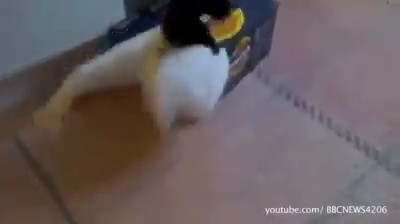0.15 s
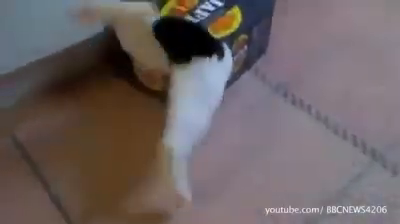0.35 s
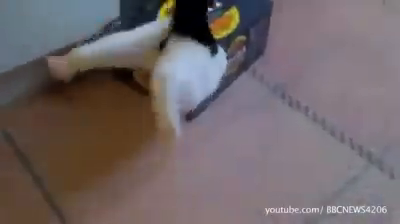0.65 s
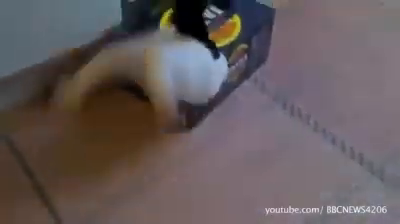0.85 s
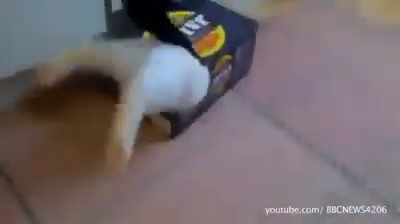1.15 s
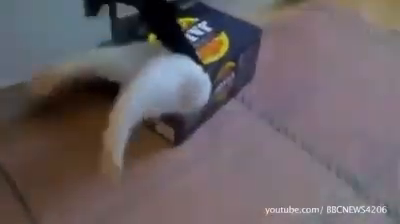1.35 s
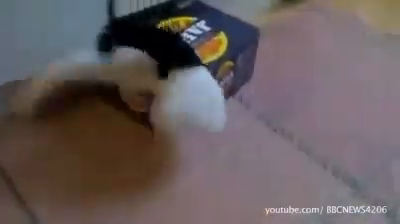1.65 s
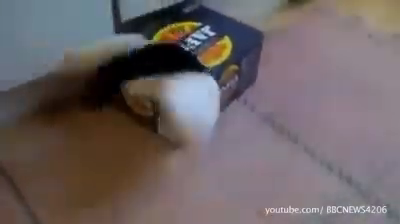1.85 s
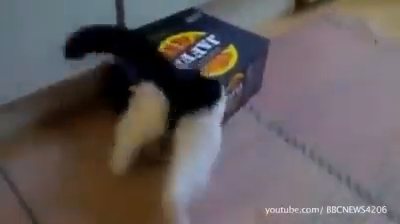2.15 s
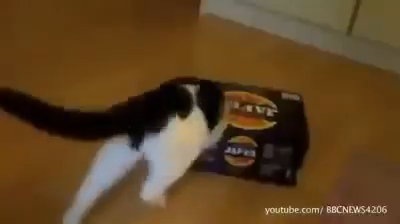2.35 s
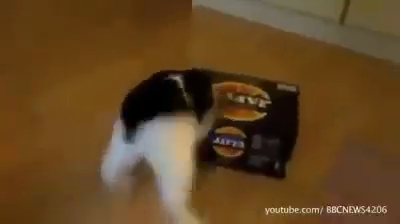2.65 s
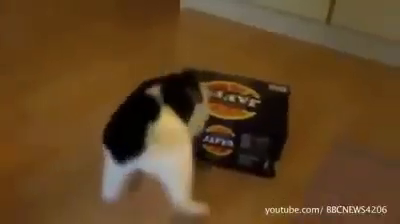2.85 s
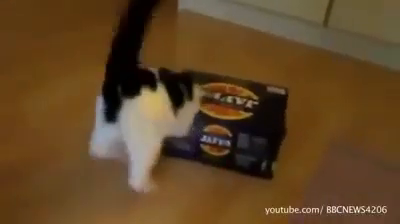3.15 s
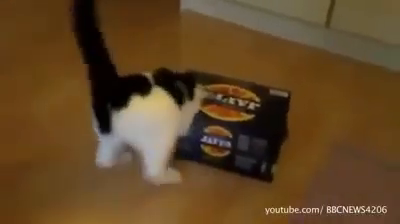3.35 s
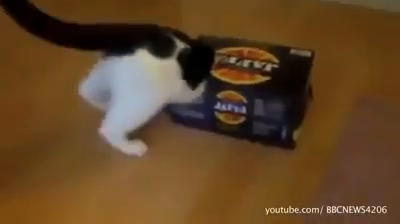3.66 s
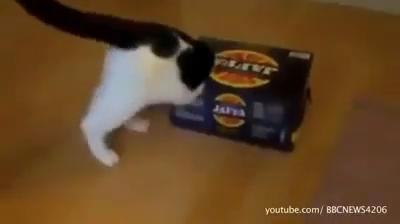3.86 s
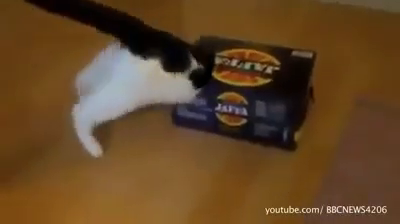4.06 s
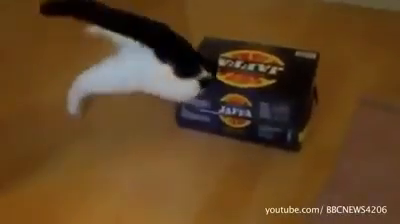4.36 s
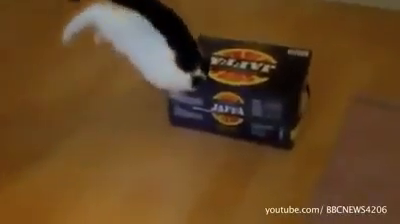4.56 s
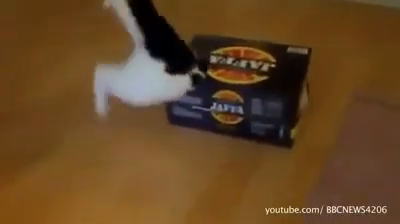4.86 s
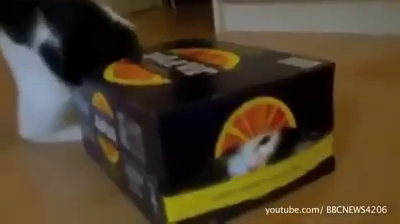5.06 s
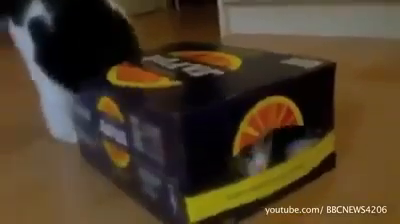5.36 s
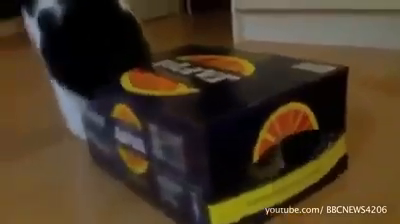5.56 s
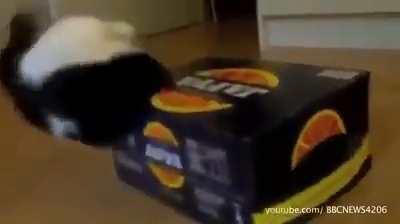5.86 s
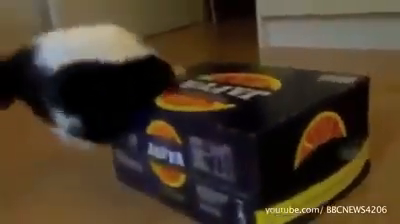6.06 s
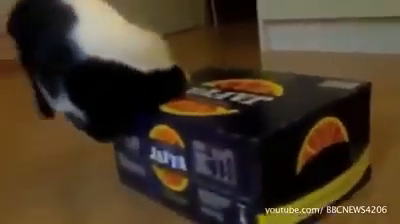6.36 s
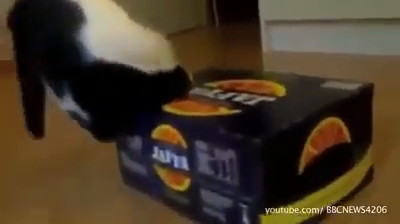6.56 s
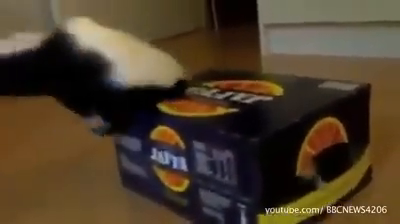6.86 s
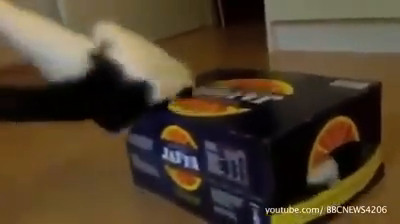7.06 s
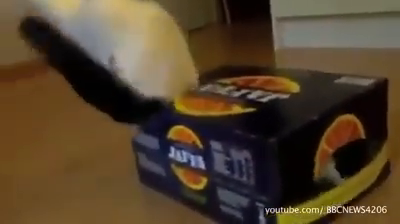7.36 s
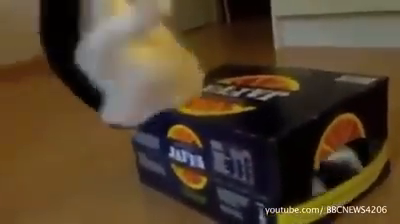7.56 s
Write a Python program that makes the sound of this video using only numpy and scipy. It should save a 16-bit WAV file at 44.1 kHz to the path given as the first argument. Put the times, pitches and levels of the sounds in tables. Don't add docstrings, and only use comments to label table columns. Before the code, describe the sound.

A kitten scrabbles and shoves a cardboard box across a hard kitchen floor, with scraping, rustling fur, claw ticks, hollow knocks and flap snaps.

```python
import sys
import numpy as np
from scipy import signal
from scipy.fft import rfft, irfft, next_fast_len
from scipy.io import wavfile
from scipy.ndimage import uniform_filter1d, map_coordinates

SR = 44100
rng = np.random.default_rng(int(sys.argv[2]) if len(sys.argv) > 2 else 0)


def volts(x):
    e = np.asarray(x, float) / 20
    return 10 ** e


def pcm_store(signal):
    levels = np.round(np.clip(np.atleast_2d(signal), -1, 1) * 32767)
    wavfile.write(sys.argv[1], SR, levels.astype(np.int16).T)


N = 339383

# (peak time [s], wall level [dB], rise [s], fall [s], brightness [dB])
ON_TILES = [(0.0, -32.5, .05, 0.2, -11), (.092, -29, 0.12, 0.26, 9), (.2, -36, 0.28, 0.25, 6.5),
            (.422, -41.5, 0.13, 0.093, 2), (.538, -43.5, 0.032, 0.14, -11), (.582, -42.5, 0.077, 0.16, -1),
            (.66, -44, 0.034, 0.04, 9), (.712, -29.5, 0.027, 0.11, 0), (.785, -36, 0.17, 0.2, 5),
            (.875, -40.5, 0.017, 0.22, 7), (.99, -48.5, 0.21, 0.13, 6), (1.435, -40.5, 0.0058, .015, -19),
            (1.52, -42, 0.1, 0.035, 4.5), (1.531, -33.5, 0.0083, 0.15, -4), (1.58, -39, 0.089, 0.19, -2),
            (1.75, -54.5, 0.067, 0.87, -10), (1.997, -39.5, .008, 0.072, 13),
            (2.022, -48, 0.014, 0.085, 19), (2.22, -58.5, 0.88, 0.19, 7)]
# (peak time [s], wall level [dB], rise [s], fall [s], brightness [dB])
ON_BOARDS = [(2.41, -33.5, 0.012, 0.13, 6), (2.464, -41, 0.047, 0.065, -12),
             (2.62, -49.5, 0.24, 0.078, -2.5), (2.759, -41, 0.047, 0.072, 9), (2.894, -44, 0.039, 0.1, 15),
             (2.951, -37.5, 0.1, 0.13, 14.5), (3.062, -39.5, 0.059, 0.13, 11.5), (3.17, -48.5, .2, 0.41, 1),
             (3.32, -42, 0.4, 0.2, 7), (3.575, -40.5, 0.22, 0.025, 6.5), (3.59, -41, 0.035, 0.017, 21.5),
             (3.669, -37.5, .04, 0.5, -2.5), (3.783, -34, 0.14, 0.11, 2.5),
             (3.888, -35.5, 0.18, 0.36, -0.5), (3.99, -46.5, 0.36, 0.079, 9.5), (4.08, -41, 0.21, 0.043, 7),
             (4.154, -31, 0.017, 0.061, 7.5), (4.17, -35, 0.033, 0.11, 15.5), (4.264, -31, 0.16, 0.27, 6.5),
             (4.393, -47.5, 0.017, 0.12, 17), (4.443, -35.5, 0.11, 0.39, 0.5), (4.65, -48.5, 0.21, 0.97, 3),
             (4.885, -50.5, .03, 0.079, -1), (5.016, -49, 0.4, 0.55, -2.5)]
# (peak time [s], wall level [dB], rise [s], fall [s], brightness [dB])
INSIDE = [(5.7, -32, 0.024, 0.082, 0), (5.764, -33, 0.037, 0.15, -2.5), (5.84, -42.5, 0.25, 0.51, -5.5),
          (6.04, -37, 0.078, .1, -3.5), (6.088, -33.5, 0.081, 0.28, 0), (6.2, -44, 0.26, 0.084, 2),
          (6.358, -30, 0.034, 0.24, -11.5), (6.694, -44.5, 0.29, .4, -2.5), (6.972, -46, 0.21, 0.34, -10),
          (7.055, -38, 0.15, 0.2, -9), (7.093, -32, 0.12, 0.28, 2), (7.16, -37, 0.24, 1, -3.5),
          (7.27, -37, 0.31, 0.2, 0.5), (7.356, -29, 0.04, 0.18, -7), (7.43, -35.5, 0.13, 0.16, -4),
          (7.625, -39.5, 0.27, 0.14, -6), (7.645, -35.5, 0.036, 0.55, 0.5)]
# (level over walls [dB], share of brightness [ratio])
EDGE_RULE = [(1.2, 0.28), (-1.5, 0.23), (-1.2, 1)]
# (level over walls [dB], share of brightness [ratio], loudest pitch [Hz])
FUR_RULE = [(-7, 0.84, 3460), (1, 1, 4160), (-12.5, .6, 4800)]
# (loudest pitch [Hz], pitch shift per 10 dB of brightness [octaves], loss per octave away [dB])
WALL_RULE = [(1190, -0.17, 6), (990, -0.03, 5), (1146, 1.5, 3)]
# (frequency [Hz], width [Hz], level [dB])
WALL_MODES = [(374, 258, -3), (551, 301, -1.5), (839, 385, -3.5), (1172, 290, -1.5), (1475, 370, -3.5)]
# (frequency [Hz], width [Hz], level [dB])
EDGE_MODES = [(1830, 434, -0.5), (2260, 225, -1), (2750, 830, -6.5)]
# (frequency [Hz], width [Hz], level [dB])
FUR_MODES = [(3000, 650, 0.5), (3770, 640, 1.5), (4350, 1540, -4), (5930, 500, 7), (6430, 1170, 2.5)]
# (frequency [Hz], width [Hz], level [dB])
DUST_MODES = [(7540, 1200, 0), (8900, 1400, 2.5)]
DUST_DB = [-27, -14.5, -30]
# (start [s], end [s],
# frequency [Hz], width [Hz], level [dB])
CHATTER = [(0.066, 0.153, 960, 170, -36), (0.066, 0.162, 2460, 290, -34), (1.529, 1.65, 1630, 250, -43.5),
           (2.012, 2.048, 920, 300, -42.5), (5.689, 5.802, 420, 390, -42), (7.045, 7.17, 1800, 470, -36.5),
           (6.03, 6.2, 4600, 3400, -46), (3.53, 3.59, 4500, 760, -41), (2.43, 2.5, 2400, 1100, -41),
           (2.75, 2.79, 2400, 900, -42.5), (7.352, 7.445, 1650, 560, -37), (4.28, 4.35, 3840, 350, -36.5),
           (3.2, 3.44, 270, 350, -51), (4.375, 4.43, 3700, 300, -42), (.705, .735, 2550, 300, -39),
           (3.665, 3.725, 1120, 130, -45), (3.76, 3.81, 4250, 300, -43), (4.029, 4.09, 5750, 290, -41.5),
           (4.15, 4.215, 4000, 250, -35), (4.21, 4.285, 3900, 500, -38), (7.028, 7.046, 1090, 90, -43),
           (7.052, 7.07, 1110, 120, -38), (7.086, 7.112, 1100, 90, -38), (7.634, 7.675, 2260, 170, -39),
           (7.674, 7.7, 2260, 200, -41), (2.7, 2.74, 5500, 2500, -52), (2.88, 3.0, 4600, 1400, -36),
           (7.35, 7.45, 1200, 450, -40), (.17, .3, 3000, 1200, -41), (.01, .09, 1100, 350, -39),
           (2.004, 2.016, 900, 250, -47.5), (2.056, 2.07, 750, 300, -51), (7.052, 7.1, 1700, 500, -43),
           (7.63, 7.71, 3540, 550, -45),
           (.082, .092, 2500, 900, -35), (.156, .167, 2300, 1500, -34), (.155, .167, 1000, 400, -38),
           (.716, .725, 2600, 500, -36), (.739, .745, 2600, 900, -40), (.649, .652, 3200, 1900, -44),
           (.8725, .877, 2000, 900, -43.5), (2.7345, 2.7378, 5800, 1500, -45),
           (2.94, 2.958, 4200, 1500, -36), (3.05, 3.066, 4200, 2500, -44), (3.586, 3.601, 4100, 900, -32),
           (4.1685, 4.179, 4250, 600, -32), (4.393, 4.401, 3800, 400, -37), (5.752, 5.768, 2020, 400, -43),
           (5.753, 5.766, 480, 250, -40), (7.103, 7.16, 1150, 130, -36), (7.14, 7.23, 1150, 200, -39.5),
           (7.06, 7.17, 2900, 1500, -43.5), (7.14, 7.31, 2600, 1500, -46), (7.363, 7.372, 1750, 700, -38),
           (7.44, 7.63, 2700, 1300, -53)]
# (time [s], peak level [dB], ring [Hz], thud level [dB], crack level [dB])
TICKS = [(0.396, -34, 2320, 2, -10), (0.6962, -16, 2480, 8, -20), (1.4335, -49, 1910, -4, -4),
         (1.532, -21.5, 1700, -15, -29), (1.9941, -34, 2870, 14, -3), (2.41, -29.5, 1960, -22, 0),
         (2.858, -31, 3600, -21, -5), (2.941, -23, 3770, -39, -29), (3.5905, -16, 4000, -36, -15),
         (4.1493, -16, 3870, -14, -8), (4.1735, -14, 4300, -30, -14), (6.076, -29, 2300, -17, -26)]
# (time [s], peak level [dB], ring [Hz], thud level [dB], crack
# level [dB])
CLAWS = [(0.6499, -21.5, 4200, 5, -14), (0.8738, -30, 4600, 10, -16), (7.34, -11, 1400, 0, -19),
         (2.7351, -16, 3800, -18, -9), (2.7362, -14, 2800, -25, -18), (4.3962, -23, 3800, -20, -16),
         (4.2398, -14.5, 4000, -20, -14), (7.6362, -19, 2100, -8, -14), (7.6368, -24, 3700, -20, -14),
         (1.994, -31, 3900, -8, -8), (2.8902, -27, 4240, -20, -14), (3.0553, -25, 3500, -15, -10),
         (2.0218, -19.5, 4470, 4.5, -11), (4.866, -28.5, 4320, 6, -3.5)]
# (time [s], peak level [dB], ring [Hz], cavity level [dB], ring t60 [s])
KNOCKS = [(1.9926, -21, 980, -11, 0.035), (3.662, -21.5, 1170, -25, 0.065), (4.437, -27, 1360, -20, 0.045),
          (5.6805, -5.5, 1118, -21, 0.032), (5.6804, -11, 572, -29, 0.026), (5.705, -25, 1180, -22, 0.03),
          (5.7565, -21.5, 1160, -10, 0.022), (7.3395, -13, 1200, 9.5, 0.032), (7.3372, -24, 900, -10, 0.01),
          (1.9964, -23, 920, -15, 0.02)]
# (time [s], peak level [dB], half width [s])
SNAPS = [(.712, -25, .00015), (.8879, -29, .0002), (4.4345, -25, .0002), (4.437, -24, .0003),
         (5.692, -26, .0003), (5.7027, -17, .0003), (5.7075, -20, .0004), (5.7111, -17, .0003),
         (5.7422, -27, .0003), (5.7527, -25, .0003), (5.7559, -20, .0003), (5.7655, -22, .0004),
         (5.814, -30, .0003), (6.3455, -30, .0004), (6.3499, -24, .0004), (6.3578, -19, .0003),
         (6.3599, -21, .0003), (6.3772, -18, .0003), (6.3895, -27, .0004), (6.4242, -29, .0003),
         (6.4403, -29, .0003), (7.056, -22, .0002), (7.1522, -21, .0002), (7.1566, -24, .0002),
         (7.181, -24, .0002), (7.1893, -26, .0002), (7.1972, -25, .0002), (7.3397, -17, .00025),
         (7.3414, -10, .00025), (7.3646, -16, .00025), (7.371, -15, .0003), (7.3776, -16, .0003),
         (7.388, -22, .0003), (7.4054, -22, .00025), (7.4146, -25, .0003), (7.4404, -23, .00025),
         (7.4525, -28, .0003), (7.6073, -33, .0003), (7.6145, -33, .0003), (7.619, -31, .0003)]
# (frequency [Hz], t60 [s])
ROOM = [(200, 0.62), (1500, 0.38), (8000, 0.16)]
# (frequency [Hz], gain [dB])
MIC = [(30, -27.5), (130, 0.5), (5000, -4), (7000, -16.5), (8500, -28.5), (9700, -34), (10000, -70)]
# (frequency [Hz], side to mid level [dB])
SPREAD = [(100, -30.5), (1000, -34.5), (2500, -26), (5000, -25.5), (9000, -31)]
CUTS = [2.47, 4.88]
# (frequency [Hz], density [dB per Hz])
TONES = [
    [(250, -14.5), (480, 3), (560, -10), (700, -5), (2000, -10.5), (5000, -16.5), (7500, -30.5),
     (9800, -58.5)],
    [(250, -9), (480, -5), (560, -10.5), (700, -11), (2000, -10), (5000, -18.5), (7500, -35.5), (9800, -55)],
    [(90, -26), (490, -3.5), (570, -20), (690, -6), (800, -10), (5000, -15), (7500, -30.5), (9800, -57.5)],
]
TONE_DB = [-57.5, -50.5, -54.5]
# (multiple of the mains [ratio], rms level [dB])
HUM = [(3, -70), (5, -69), (7, -72), (10, -69), (14, -69), (20, -74), (22, -76), (23, -73), (24, -72),
       (32, -78)]
# (frequency [Hz], density [dB per Hz])
RUMBLE = [(14, -12.5), (24, -6), (40, 9.5), (60, 3), (90, 4.5), (140, -56)]
RUMBLE_DB = [-61.5, -67, -73]
# (time [s], level [dB])
JOLTS = [(0.0, -51), (.41, -75), (.7, -53), (.85, -55), (1.235, -58), (1.34, -58), (1.549, -56),
         (2.01, -63), (3.6, -62), (5.05, -70), (2.44, -57.5), (4.18, -56), (5.68, -58), (6.02, -66),
         (7.07, -70), (7.35, -67)]
# (peak time [s], peak level [dB], half width [s])
BUMPS = [(.7, -30.5, 0.0043), (.748, -39, .005), (.785, -42, .008), (1.236, -41, 0.0087),
         (1.305, -40, 0.0031), (1.346, -39, 0.0058)]
# (frequency [Hz], density [dB per Hz])
BOOM = [(70, -29), (110, -1.5), (160, -1), (250, 1.5), (330, -3), (500, -53.5)]
BOOM_DB = [-59, -57, -58.3]

REST_HZ, REST_DB = 720, -49
HIT_S = np.arange(int(.08 * SR)) / SR


def drag():
    on_walls, on_edge, on_fur, wall_hz, fur_hz, focus_db = pressure()
    walls = friction(WALL_MODES, (300, 1900), wall_hz, focus_db=focus_db, rate=450,
                     scatter_db=5.5, clump_db=-0.3, smooth=2.7)
    edge = friction(EDGE_MODES, (1300, 3500), np.full_like(wall_hz, 2400), focus_db=12.0, rate=1700,
                    scatter_db=-0.5, clump_db=0.16, smooth=1.0)
    fur = friction(FUR_MODES, (3000, 8000), fur_hz, focus_db=17.0, rate=2200,
                   scatter_db=-2.0, clump_db=0.5, smooth=5.9)
    dust = friction(DUST_MODES, (6000, 11000), fur_hz, focus_db=0.5, rate=2600,
                    scatter_db=7.0, clump_db=4.0, smooth=1.5)
    on_dust = on_fur + volts(-4.5) * on_walls
    out = volts(np.array(DUST_DB)[scene_index()]) * sampled(on_dust) * dust
    out += volts(2.89) * sampled(on_walls) * walls
    out += volts(0.08) * sampled(on_edge) * edge
    return out + volts(3.0) * sampled(on_fur) * fur


def pressure():
    tables = [ON_TILES, ON_BOARDS, INSIDE]
    s, db, rise, fall, bright = np.concatenate(tables).T
    kind = np.repeat(np.arange(len(tables)), [len(t) for t in tables])
    edge_db, edge_share = np.array(EDGE_RULE)[kind].T
    fur_db, fur_share, fur_hz = np.array(FUR_RULE)[kind].T
    wall_hz, octaves, focus_db = np.array(WALL_RULE)[kind].T
    walls = swells(s, db, rise, fall)
    edge = swells(s, db + edge_db + edge_share * bright, rise, fall, steeper=1.077)
    fur = swells(s, db + fur_db + fur_share * bright, rise, fall, steeper=1.36)
    rest = volts(REST_DB) ** 2
    stroke_hz = wall_hz * 2 ** (octaves * bright / 10)
    wall_pitch = (stroke_hz @ walls + REST_HZ * rest) / (walls.sum(0) + rest)
    fur_pitch = fur_hz @ fur / fur.sum(0)
    focus = focus_db @ walls / walls.sum(0)
    gains = [np.sqrt(p.sum(0)) for p in (walls, edge, fur)]
    return gains + [wall_pitch, fur_pitch, focus]


def swells(s, db, rise, fall, steeper=1):
    t = np.arange(N * 1000 // SR + 2) / 1000 - s[:, None]
    before = -t / np.maximum(rise, .004)[:, None]
    after = t / np.maximum(fall, .004)[:, None]
    span = np.where(t < 0, before, after)
    return volts(db[:, None] - steeper * 20 * span) ** 2


def friction(modes, skirt_hz, loudest_hz, focus_db, rate, scatter_db, clump_db, smooth):
    size = volts(scatter_db * np.clip(rng.standard_normal(N), -2, 2))
    slips = (rng.random(N) < rate / SR) * -size
    clumps = volts(clump_db * (wobble(28) + wobble(90)))
    rub = (unit(slips) + smooth * rng.standard_normal(N)) * clumps
    low, high = skirt_hz
    hz, width, db = np.transpose(modes)[:, :, None]

    def response(f):
        skirt = (1j * f / low / (1 + 1j * f / low)) ** 2 / (1 + 1j * f / high) ** 2
        return skirt * volts(db) * 1j * f * width / (hz * hz - f * f + 1j * f * width)

    rings = filtered(rub, response)
    share = volts(-focus_db * np.abs(np.log2(hz / loudest_hz)))
    power = np.sum(share ** 2 * np.mean(rings ** 2, axis=1, keepdims=True), axis=0)
    gains = share / np.sqrt(power)
    return sum((-1) ** k * sampled(g) * r for k, (g, r) in enumerate(zip(gains, rings)))


def chatter():
    out = np.zeros(N + SR)
    for start, end, hz, width, db in CHATTER:
        n = int((end - start) * SR)
        mode = signal.iirpeak(hz, hz / (1.5 * width), SR)
        swing = signal.lfilter(*mode, signal.lfilter(*mode, rng.standard_normal(16384)))
        evenness = np.clip(.6 * (1 - 2 * width / hz), 0, 1)
        swing = swing / np.abs(signal.hilbert(swing)) ** evenness
        rub = swing[2000:][:n] * signal.windows.tukey(n, .6) * volts(-4 * np.arange(n) / n)
        place(out, start, volts(db) * unit(np.pad(rub, (0, 2000)))[:n])
    return out[:N]


def ticks():
    out, t = np.zeros(N + SR), HIT_S
    lead_s = .0006
    events = [(*r, .0095) for r in TICKS] + [(*r, .005) for r in CLAWS]
    for s, db, hz, thud_db, crack_db, t60 in events:
        grit = 0.38 * rng.standard_normal(len(t)) * volts(-60 * t / max(2.13 * t60, .002))
        step = (1 - t / 0.00024) * np.exp(-t / 0.0001) * (1 - np.exp(-t / .00006))
        crack = step + grit
        thud = ring(930, 0.0023, attack=0.0002) - 1.1 * ring(1900, 0.0017, attack=.0001)
        place(out, s, -volts(db + 8.5) * ring(hz, t60, attack=0.00043))
        place(out, s + lead_s, volts(db + thud_db + 3.5) * thud - volts(db + crack_db + 13.5) * crack)
    return out[:N]


def knocks():
    out, t = np.zeros(N + SR), HIT_S
    cavity_hz = 547
    settle = 1 / (1 + (t / 0.0066) ** 6)
    push = np.exp(-((t - .0004) / 0.00075) ** 2) * (1 - np.exp(-t / 0.0004)) ** 2
    for s, db, hz, cavity_db, t60 in KNOCKS:
        puff = uniform_filter1d(rng.standard_normal(len(t)), size=8) * volts(-60 * t / .008)
        rings = ring(hz, t60, attack=0.0012) - volts(cavity_db) * ring(cavity_hz, 3 * t60, attack=0.0014)
        swing = ring(0.85 * hz, 0.007, attack=0.00028)
        push_db = -35 - 0.18 * db + 12.5
        hit = settle * rings + 2.4 * swing + volts(push_db) * push + 0.042 * puff
        place(out, s + .0004, -volts(db) * hit)
    return out[:N]


def ring(hz, t60, attack):
    decay = volts(-60 * HIT_S / max(t60, .002))
    return np.sin(2 * np.pi * hz * HIT_S) * decay * (1 - np.exp(-HIT_S / attack)) ** 2


def snaps():
    out, t = np.zeros(N + SR), np.arange(-100, 100) / SR
    for s, db, half in SNAPS:
        u = (t / (1.3 * half)) ** 2
        place(out, s + t[0], -volts(db - 1) * (1 - 2 * u) * np.exp(-u))
    return out[:N]


def room(x):
    hz, t, z = signal.stft(rng.standard_normal(SR // 2), SR, nperseg=256)
    decay = volts(-60 * t / along(ROOM, hz)[:, None])
    tail = signal.istft(z * decay, SR, nperseg=256)[1]
    return signal.fftconvolve(np.pad(x, (350, 0)), tail / np.linalg.norm(tail))[:N]


def background():
    return room_tone() + hum() + bumps() + rumble() + boom()


def room_tone():
    out = np.zeros(N)
    for k, spectrum in enumerate(TONES):
        fade = np.sqrt(np.abs(uniform_filter1d(1. * (scene_index() == k), int(0.43 * SR))))
        out += fade * volts(TONE_DB[k] + 0.21 * wobble(5)) * hiss(spectrum)
    return out


def hum():
    t, mains_hz = np.arange(N) / SR, 50.02
    out = np.zeros(N)
    for k, db in HUM:
        line = np.sin(2 * np.pi * (k * mains_hz * t + rng.random()))
        out += np.sqrt(2) * volts(db + 2.5 * wobble(4)) * line
    return out


def bumps():
    out, t = np.zeros(N + SR), np.arange(-4000, 4000) / SR
    for s, db, half in BUMPS:
        dip = np.exp(-(t / half) ** 2) - 0.43 * np.exp(-(t / (3.0 * half)) ** 2)
        place(out, s + t[0], -volts(db) * dip)
    return out[:N]


def rumble():
    s, db = np.transpose(JOLTS)
    jolts = sampled(swells(s, db, rise=0 * s + .04, fall=0 * s + 0.18).sum(0))
    steady = volts(np.array(RUMBLE_DB)[scene_index()]) ** 2
    return np.sqrt(jolts + steady) * unit(volts(1.2 * wobble(14)) * hiss(RUMBLE))


def boom():
    shove = np.abs(uniform_filter1d(pressure()[0] ** 2, 53))
    shove_db = 10 * np.log10(shove + volts(REST_DB) ** 2)
    boom_db = np.array(BOOM_DB)[scene_index()] + 0.55 * sampled(shove_db + 43.5)
    return volts(boom_db) * unit(volts(1.2 * wobble(12)) * hiss(BOOM))


def scene_index():
    return np.searchsorted(CUTS, np.arange(N) / SR)


def place(out, s, sound):
    out[round(s * SR):][:len(sound)] += sound


def unit(x):
    return x / np.sqrt(np.mean(x ** 2) + 1e-20)


def along(points, hz):
    f, v = np.transpose(points)
    return np.interp(np.log(hz + 1), np.log(f + 1), v)


def sampled(v):
    return np.interp(np.arange(N) * 1000 / SR, np.arange(len(v)), v)


def wobble(rate):
    at = np.arange(0, N + 16, 16)
    knots = rng.standard_normal(int(N * rate / SR) + 4)
    return np.interp(np.arange(N), at, map_coordinates(knots, [at * rate / SR]))


def filtered(x, response):
    m = next_fast_len(N + SR // 2)
    return irfft(rfft(x, m) * response(np.fft.rfftfreq(m, 1 / SR)), m)[..., :N]


def hiss(spectrum):
    return unit(filtered(rng.standard_normal(N), lambda hz: volts(along(spectrum, hz))))


def scene():
    rasp = drag() + chatter()
    hits = ticks() + knocks() + snaps()
    mid = rasp + hits + volts(-19.5) * room(rasp) + volts(-15.5) * room(hits)
    mid = filtered(mid, lambda hz: volts(along(MIC, hz))) + background()
    end_s = 7.696
    return np.array([mid, mid]) * (np.arange(N) < end_s * SR)


def top_cut(x):
    return signal.sosfilt(signal.butter(12, 9950, fs=SR, output="sos"), x)


def record(dry):
    hz, _, z = signal.stft(dry[0], SR, nperseg=1024)
    field = uniform_filter1d(rng.standard_normal(z.shape), size=24, axis=0)
    field = uniform_filter1d(field, size=3, axis=1)
    is_patch = unit(field) + 1.1 * rng.standard_normal(z.shape[1]) > .7
    scrambled = z * is_patch * np.exp(2j * np.pi * rng.random(z.shape))
    spread = volts(along(SPREAD, hz) + 10.5)[:, None]
    side = signal.istft(scrambled * spread, SR, nperseg=1024)[1][:N]
    mix = dry + np.array([side, -side]) + 0.0013
    return top_cut(mix)


dry = scene()
out = record(dry)
pcm_store(out)
```